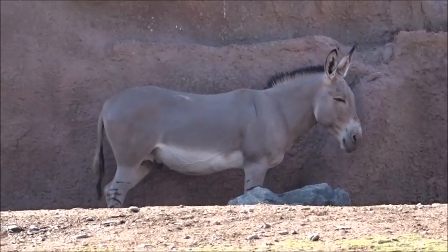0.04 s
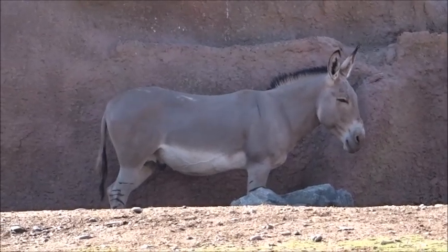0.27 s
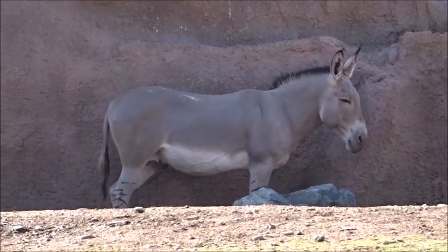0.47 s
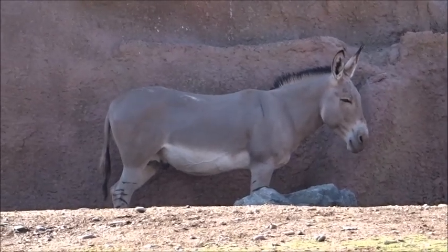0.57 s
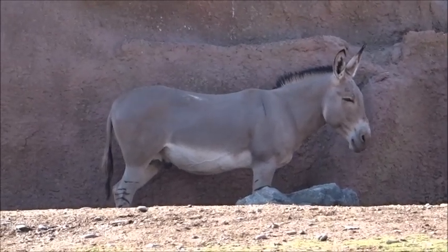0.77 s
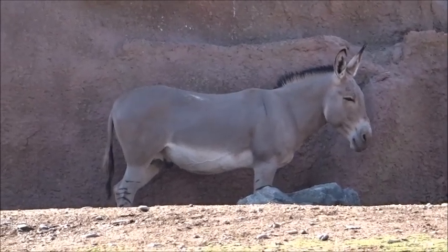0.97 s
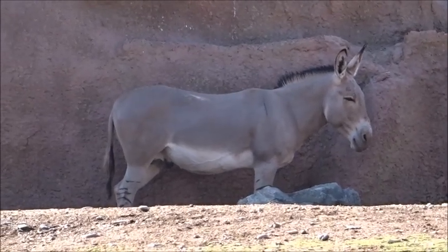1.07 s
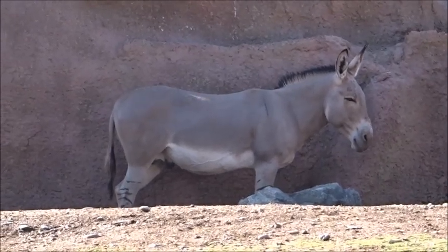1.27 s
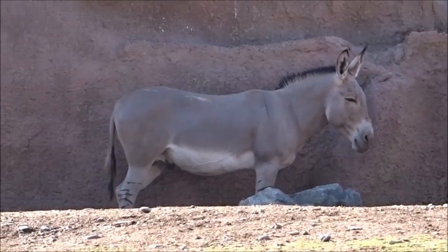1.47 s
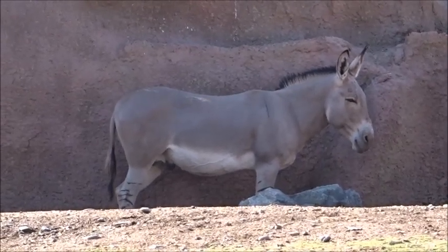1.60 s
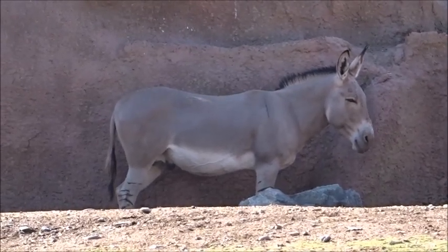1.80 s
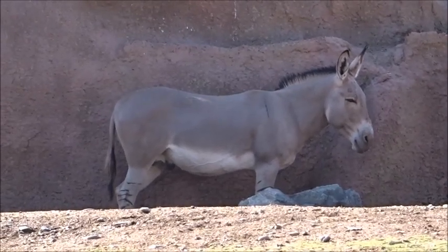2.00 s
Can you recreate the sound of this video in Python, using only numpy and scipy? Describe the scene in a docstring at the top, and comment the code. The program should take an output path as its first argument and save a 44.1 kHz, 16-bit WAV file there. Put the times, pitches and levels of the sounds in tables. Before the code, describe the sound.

A donkey brays in high, harsh, quavering squeals that echo around an outdoor enclosure.

```python
"""A donkey brays in a run of high, harsh squeals, some way off in front of a rock wall.
Each squeal scoops up, quavers and falls away: a tone shaped by the throat, with rasping air.
A second, thinner whistle of the voice sounds beside it and carries on between the squeals.
Ground and rock echo the voice and the enclosure rings, over soft thuds and a faint outdoor wash."""
import sys
import numpy as np
from scipy import signal
from scipy.fft import rfft, irfft
from scipy.io import wavfile

SR = 44100
rng = np.random.default_rng(int(sys.argv[2]) if len(sys.argv) > 2 else 0)


def unload_audio(sound):
    """Save the sound as a 16-bit wav file, at the path given as the first command line argument."""
    columns = np.transpose(np.atleast_2d(sound))
    # keep every value between -1 and 1, then stretch to whole-number steps
    steps = np.round(np.clip(columns, -1, 1) * 32767)
    wavfile.write(sys.argv[1], SR, steps.astype(np.int16))


N = 90404

# one curve per squeal or whistle: time_s, pitch_hz, level_db, quaver_depth_hz, quaver_rate_hz
SQUEAL_CURVES = [
    [(0, 945, -35.5, 2.4, 21), (.012, 943, -40, 3, 20), (.028, 816, -59, 2.7, 35)],
    [(.202, 932, -50, 75, 45), (.208, 947, -48, 64, 42.4), (.211, 995, -38, 48, 35),
     (.232, 1089, -36, 25, 34), (.29, 1140, -34, 50, 37.2), (.322, 1108, -33, 11, 34.3),
     (.365, 1074, -33.5, 45, 28), (.405, 1109, -33, 37, 39), (.425, 1084, -32, 6.3, 25),
     (.45, 1075, -34.5, 2.4, 43), (.474, 906, -41.5, 3.35, 34)],
    [(.622, 907.5, -45, 32, 38.6), (.635, 996, -36.5, 36.4, 34.3), (.655, 1114, -36.5, 66, 29.7),
     (.686, 1161, -33.5, 69, 41.3), (.735, 1060, -33, 23, 35.5), (.775, 1085, -33.5, 34, 30),
     (.825, 1127, -31, 58, 41), (.85, 1040, -35.5, 29, 38), (.86, 900, -41.5, 11.3, 38.6),
     (.876, 795, -64, 2.6, 31)],
    [(1.02, 861.5, -70.5, 29, 41), (1.035, 986, -32, 23, 33.3), (1.052, 1128, -30.5, 67, 23.7),
     (1.1, 1163, -30, 43, 33.8), (1.135, 1067, -30, 38, 27.9), (1.16, 1097, -28.5, 28, 46.4),
     (1.228, 1135, -29, 65, 32.3), (1.256, 1073, -30.5, 32, 39), (1.277, 940, -34, 5.8, 57),
     (1.292, 796, -58, 2.5, 38)],
    [(1.458, 1066, -36.5, 69, 31.3), (1.465, 1064, -36, 77, 39), (1.469, 1095, -28, 84, 28.6),
     (1.49, 1134, -26, 62, 31.3), (1.54, 1153, -27, 25, 39.2), (1.568, 1084, -26, 4.2, 54),
     (1.592, 1105, -26, 48, 41), (1.645, 1097, -25.5, 15, 33.5), (1.675, 1061, -25, 2.8, 38),
     (1.701, 1107, -26, 18, 61), (1.732, 1036, -28, 4.44, 39.5), (1.745, 946.4, -32, 1.1, 33),
     (1.772, 796, -42.5, 5.5, 28)],
]
WHISTLE_CURVES = [
    [(0, 1233, -40.5, 3, 30), (.025, 1152, -41.5, 2.6, 30), (.052, 1137, -44.5, 12, 36),
     (.066, 1085, -45, 68, 36), (.084, 1135, -44, 59, 36), (.097, 985, -43.5, 5, 36),
     (.113, 1018, -46.5, 3, 36), (.135, 860, -66, 3, 36)],
    [(.375, 1220, -52, 3.5, 30), (.39, 1206, -46, 3, 30), (.44, 1180, -46, 1.5, 30),
     (.485, 1143, -40, 3, 30), (.53, 1172, -41.5, 2.63, 30), (.6, 1199, -40.5, 1.3, 30),
     (.65, 1206, -40, 1.9, 30), (.68, 1160, -48, 5.6, 30)],
    [(.889, 1083, -43, 40.4, 32), (.9, 1092, -43, 61, 32), (.925, 1105, -40, 92, 32),
     (.96, 1067, -43, 46, 32), (.99, 1074, -45.5, 25, 32), (1.02, 1148, -38, 24, 32),
     (1.06, 1187, -37, 3.7, 32), (1.12, 1179, -36.5, 8.8, 32)],
    [(1.47, 1199, -53, 4.4, 30), (1.52, 1200, -45, 13.3, 30), (1.58, 1170, -45.5, 3.6, 30),
     (1.63, 1195, -39, 3.4, 30), (1.69, 1187, -34.5, 4, 30), (1.73, 1198, -38, 4.4, 30),
     (1.765, 1164, -35.5, 6.7, 30), (1.777, 1038, -39.5, 3.3, 30), (1.793, 1112, -42.5, 2.9, 30),
     (1.815, 867, -45, 3, 30)],
]
# one row per curve: treble_db, rasp_db, catch_amount (0-1, how rough the start is), catch_s
SQUEAL_TEXTURES = [(-1.5, -17, 0.07, .02), (-0.5, -30, .6, 0.04), (-0.5, -24, .65, 0.041),
                   (-2.5, -18, 1, 0.015), (-6, -26, 0.6, 0.014)]
WHISTLE_TEXTURES = [(-3, -23, .1, .02), (-1.5, -24.5, 0.11, .02), (-1.5, -18.5, 0.18, 0.03),
                    (-1.5, -22.5, .1, 0.024)]
# strength of the harmonics before the throat shapes them: frequency_hz, gain_db
SQUEAL_SPECTRUM = [(1100, -1.5), (2200, 0), (3300, 0), (4400, 1.5), (5500, 0), (10000, 0)]
WHISTLE_SPECTRUM = [(1150, -0.5), (2350, -0.5), (3550, -1), (4700, 4.5), (5900, -1), (10000, -3)]
# how throat and muzzle boost or soften the tone: frequency_hz, gain_db
THROAT_GAINS = [(300, -33), (850, -0.5), (1100, -13), (1500, 2.5), (1850, 0), (2200, -7), (2600, -1),
                (2900, 0), (3250, 2), (3600, -1), (4300, -6.5), (4750, -11.5), (5450, -11.5), (5950, -14.5),
                (6500, -27.5), (7600, -26), (8800, -20), (10000, -18), (12000, -24.5), (15000, -39)]
# rush of air in the voice: frequency_hz, level_db
RASP_SPECTRUM = [(200, -35.5), (600, -17.5), (1050, -10), (1400, -11.5), (2200, -21), (2650, -26),
                 (3300, 11), (3900, 1), (4500, 8.5), (5100, -10.5), (5700, -9.5), (6800, -1), (9500, -17.5),
                 (12500, -9), (15000, -31.5)]
# dull croak when the pitch sags: frequency_hz, level_db
CROAK_SPECTRUM = [(400, -17), (1100, -7.5), (1900, -1.5), (2600, -4), (3300, 2), (4500, -6), (6000, -23.5),
                  (15000, -38.5)]
# echoes from ground and rock: delay_s, gain_db
NEAR_ECHOES = [(.0023, -28.5), (.0071, -29.5), (0.0129, -14), (.029, -17.5)]
# time the enclosure's ring takes to fade by 60 dB: frequency_hz, fade_s
RING_TIMES = [(200, 1.1), (1000, 4.8), (3200, 0.85), (5000, 0.62), (9000, .3), (15000, 0.25)]
# soft, low thuds: start_s, level_db, pitch_hz
THUD_EVENTS = [(.305, -49.5, 175), (.992, -46, 180), (1.053, -52, 70), (1.654, -50, 180),
               (1.825, -57, 60.8)]
# outdoor background noise: frequency_hz, level_db
WASH_SPECTRUM = [(25, -3), (50, -15.5), (80, -0.5), (130, -7.5), (250, -5.5), (400, -1.5), (600, 3),
                 (950, 10), (1350, 4), (1750, 3.5), (2200, 3), (2600, -13.5), (3200, 10), (3800, -9.5),
                 (4300, -1.5), (5000, -11), (7000, -18), (11000, -20), (15000, -22.5)]

QUAVER_SNAP = 2.7  # higher makes the quaver flip more sharply between high and low
STEADY_HZ, SAG_SPAN_HZ = 1074, 194  # the voice starts to strain below this pitch, fully over this span
ROUGH_JITTER, RATTLE_DEPTH, RATTLE_HZ = 0.021, 0.36, 390  # a rough voice shakes and rattles
CATCH_RASP_DB, CROAK_DB, SAG_DULL_DB = -5, -11.5, -2.5
FRAY_RATE_HZ, THROAT_LAG_RAD, EDGE_FADE_S = 138, 0.24, 0.0018
RING_DB, THUD_RISE_S, WASH_DB = -20, 0.0022, -48
END_S, TOP_HZ = 1.956, 15200


def donkey():
    """The voice vibrates in two ways at once: loud squeals and a thin whistle."""
    out = np.zeros(N)
    for curve, texture in zip(SQUEAL_CURVES, SQUEAL_TEXTURES):
        add(out, *voice(curve, *texture, SQUEAL_SPECTRUM,
                        jitter=0.0028, shimmer_db=0.56, dip_db=1.56, fray_hz=8550))
    for curve, texture in zip(WHISTLE_CURVES, WHISTLE_TEXTURES):
        add(out, *voice(curve, *texture, WHISTLE_SPECTRUM,
                        jitter=0.0033, shimmer_db=1.3, dip_db=0.5, fray_hz=10000))
    return out


def voice(curve, treble_db, rasp_db, catch, catch_s, spectrum, jitter, shimmer_db, dip_db, fray_hz):
    """A quavering tone shaped by the throat, with rasping air. Returns its start time and sound."""
    times, *columns = np.transpose(curve)
    t = np.arange(times[0], times[-1], 1 / SR)
    n, age = len(t), t - t[0]
    pitch, level, depth, rate = (np.interp(t, times, column) for column in columns)
    swing = np.cos(2 * np.pi * np.cumsum(rate) / SR)
    quaver = depth * np.tanh(QUAVER_SNAP * swing) / np.tanh(QUAVER_SNAP)
    # the voice turns rough as it catches at the start and where its pitch sags
    catching = catch * np.exp(-(age / catch_s) ** 2)
    strain = np.clip((STEADY_HZ - pitch) / SAG_SPAN_HZ, 0, 1)
    roughness = catching + 0.64 * strain
    shake = (jitter + ROUGH_JITTER * roughness) * wobble(350)[:n] + .005 * wobble(86)[:n]
    hz = (pitch + quaver) * (1 + shake)
    phase = 2 * np.pi * np.cumsum(hz) / SR
    tone = np.zeros(n)
    for k in range(1, 17):  # harmonics: whole multiples of the pitch
        # those near and above fray_hz each waver on their own
        fray = (k * pitch / fray_hz) ** 2
        waver = (wobble(FRAY_RATE_HZ)[:n] + 1j * wobble(FRAY_RATE_HZ)[:n]) / np.sqrt(2)
        ragged = (1 + fray * waver) / np.sqrt(1 + fray ** 2)
        gain_db = read(THROAT_GAINS, k * hz) + read(spectrum, k * pitch)
        gain_db += treble_db * np.clip((k - 4) / 4, 0, 1)
        gain_db += SAG_DULL_DB * strain * np.clip(k / 3 - 1, 0, 1)
        harmonic = (ragged * np.exp(1j * k * (phase - THROAT_LAG_RAD * k))).real
        tone += amp(gain_db) * (k * hz < TOP_HZ) * harmonic
    rattle = 1 + RATTLE_DEPTH * roughness * np.cos(2 * np.pi * RATTLE_HZ * age + wobble(150)[:n])
    puffs = 1 + 1.1 * np.cos(phase)  # the air pulses in step with the tone
    air = noise(RASP_SPECTRUM)[:n] * puffs * (amp(rasp_db) + catching * amp(CATCH_RASP_DB))
    air += noise(CROAK_SPECTRUM)[:n] * strain * amp(CROAK_DB)
    fades = np.clip(np.minimum(age, age[::-1]) / EDGE_FADE_S, 0, 1)
    # the voice thins on each upward flick
    loudness = amp(level + shimmer_db * wobble(130)[:n] - dip_db * quaver / (depth + 15))
    return t[0], fades * loudness * rattle * (tone + air)


def enclosure(sound):
    """Adds echoes from ground and rock, and a ring whose high notes die first."""
    hz, t, hiss = signal.stft(rng.standard_normal(SR), SR, nperseg=256)
    decay = amp(-60 * t / read(RING_TIMES, hz)[:, None])
    tail = signal.istft(hiss * decay, SR, nperseg=256)[1]
    build_up = np.minimum(np.arange(len(tail)) / SR / 0.032, 1)
    response = amp(RING_DB) * tail / np.linalg.norm(tail) * build_up
    response[0] = 1  # the sound that arrives directly
    for delay_s, gain_db in NEAR_ECHOES:
        add(response, delay_s, amp([gain_db]))
    return signal.fftconvolve(sound, response)[:N]


def thuds():
    """Dull bumps: low tones that swell and die almost at once."""
    out, t = np.zeros(N), np.arange(SR // 10) / SR
    bump = t / THUD_RISE_S * np.exp(1 - t / THUD_RISE_S)
    for start_s, level_db, pitch_hz in THUD_EVENTS:
        add(out, start_s, amp(level_db) * bump * np.sin(2 * np.pi * pitch_hz * t))
    return out


def outdoor_wash():
    """Faint background noise whose level flickers a little."""
    return amp(WASH_DB + 1.15 * wobble(36)) * noise(WASH_SPECTRUM)


def amp(db):
    """Turns decibels into a gain to multiply by."""
    return 10 ** (np.asarray(db) / 20)


def unit(x):
    """Scales a signal to an average (rms) level of 1."""
    return x / np.sqrt(np.mean(x ** 2) + 1e-20)


def read(points, hz):
    """Looks up a table at hz, blending between rows on a log-frequency scale."""
    frequencies, values = np.transpose(points)
    return np.interp(np.log(hz + 1), np.log(frequencies + 1), values)


def add(mix, start_s, sound):
    """Mixes a sound in at start_s."""
    part = mix[max(round(start_s * SR), 0):][:len(sound)]
    part += sound[:len(part)]


def noise(spectrum):
    """Noise of level 1, coloured by a spectrum table."""
    gains = amp(read(spectrum, np.fft.rfftfreq(N, 1 / SR)))
    return unit(irfft(rfft(rng.standard_normal(N)) * gains, N))


def wobble(hz):
    """Random motion of level 1, up to about hz wiggles a second."""
    step = 16  # samples between random points
    size = N // step + 2
    damping = 1 + (np.fft.rfftfreq(size, step / SR) / hz) ** 4
    slow = irfft(rfft(rng.standard_normal(size)) / damping, size)
    return np.interp(np.arange(N) / step, np.arange(size), unit(slow))


def scene():
    """Everything sits in the middle; a trace of noise adds stereo width."""
    wash = outdoor_wash()
    middle = enclosure(donkey()) + thuds() + wash
    side = amp(-83.5) * noise([(30, 1), (200, 2), (1000, 2.5), (3000, -4.5), (15000, -9.5)])
    return np.array([middle + side, middle - side])


def record(dry):
    """Stops the sound short at END_S and removes the treble above TOP_HZ."""
    fade_out = np.clip((END_S - np.arange(N) / SR) / .012, 0, 1) ** 3
    low_pass = signal.firwin(511, TOP_HZ, window=("kaiser", 9), fs=SR)
    return signal.oaconvolve(dry * fade_out, low_pass[None], "same")


dry = scene()
out = record(dry)
unload_audio(out)
```